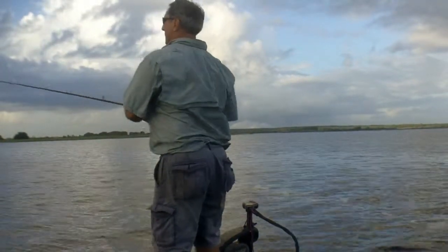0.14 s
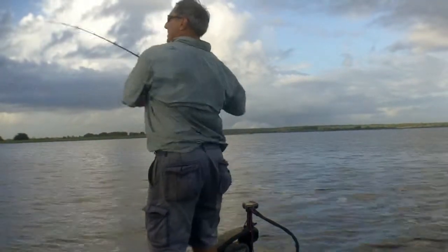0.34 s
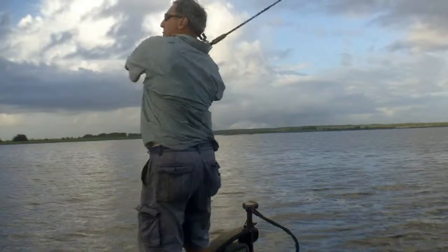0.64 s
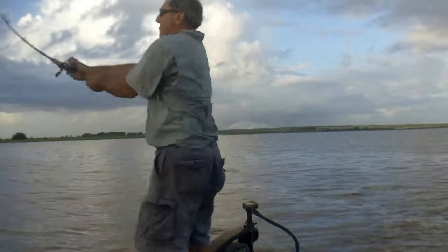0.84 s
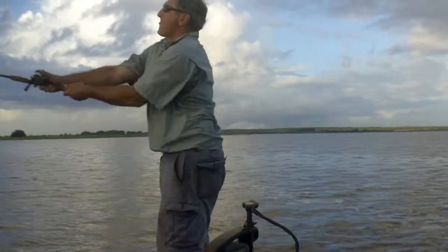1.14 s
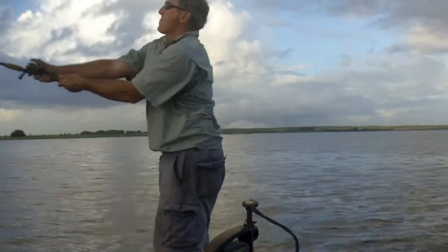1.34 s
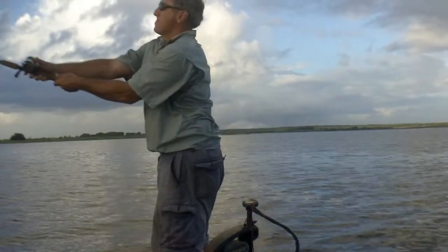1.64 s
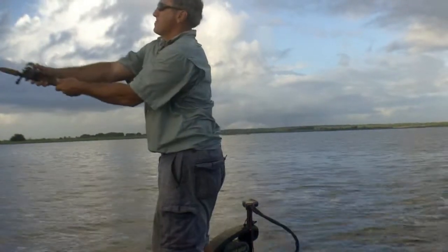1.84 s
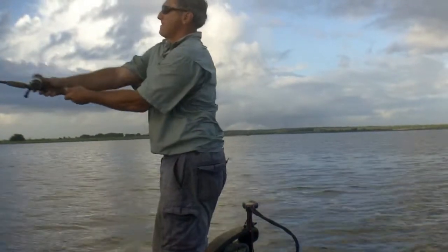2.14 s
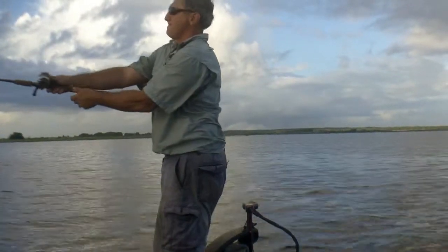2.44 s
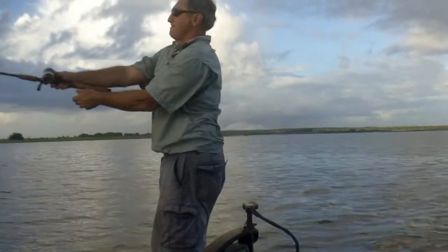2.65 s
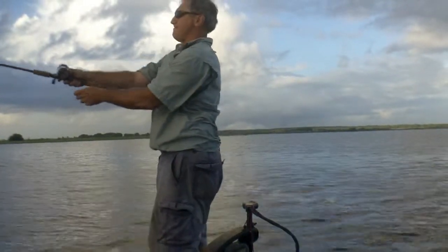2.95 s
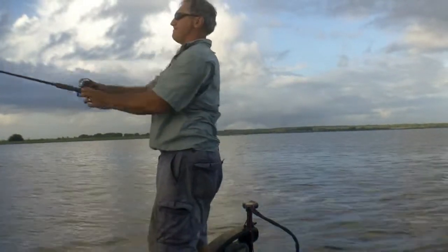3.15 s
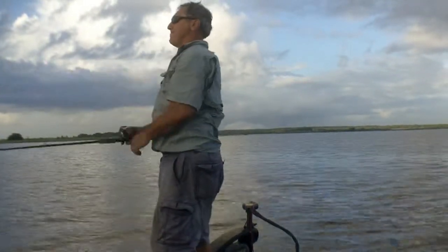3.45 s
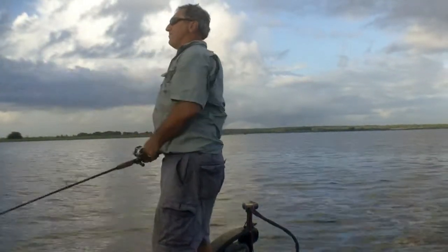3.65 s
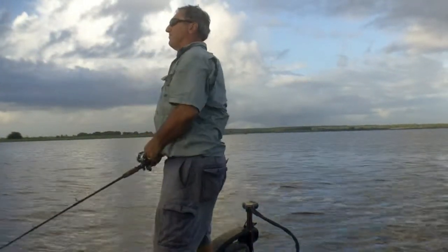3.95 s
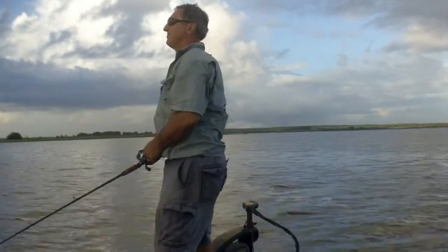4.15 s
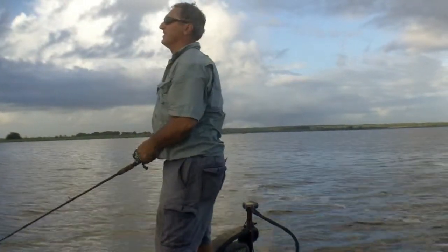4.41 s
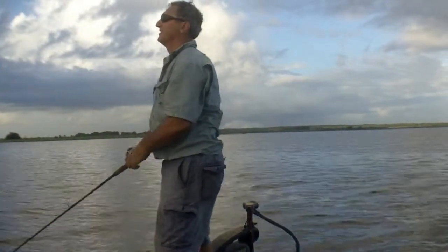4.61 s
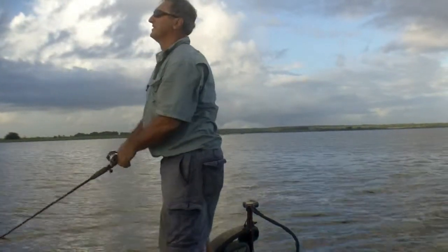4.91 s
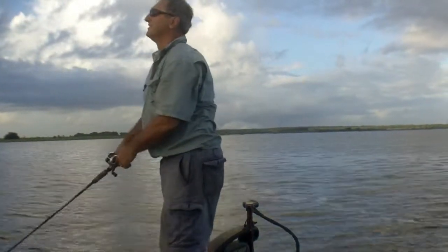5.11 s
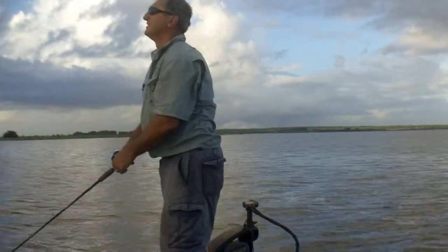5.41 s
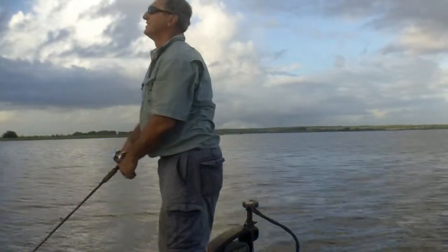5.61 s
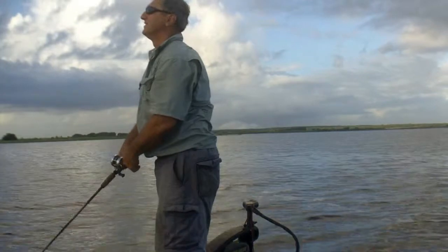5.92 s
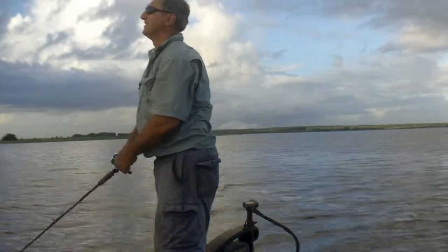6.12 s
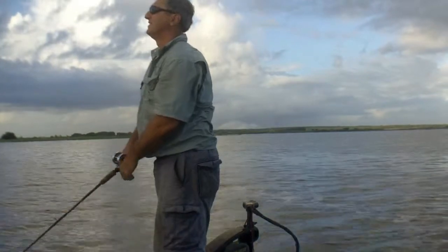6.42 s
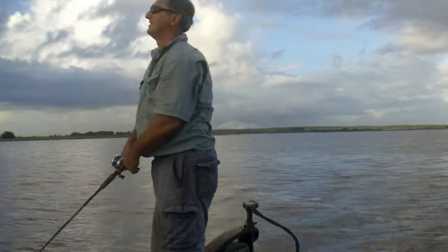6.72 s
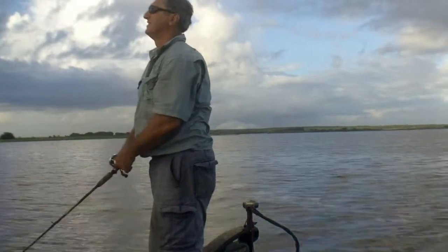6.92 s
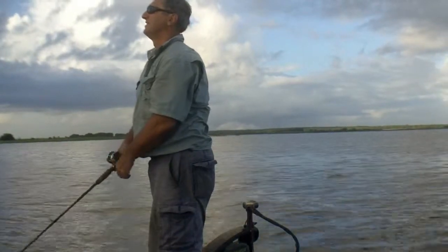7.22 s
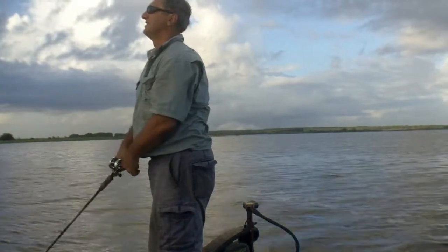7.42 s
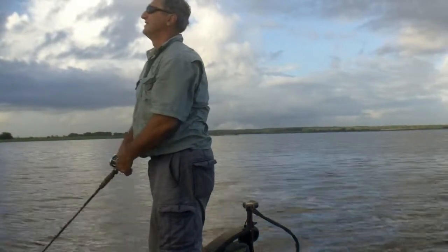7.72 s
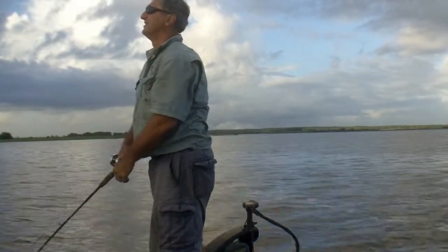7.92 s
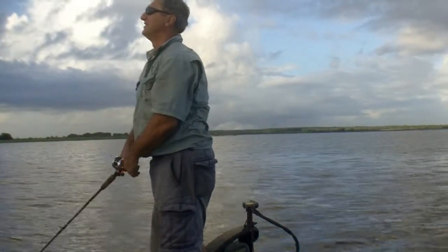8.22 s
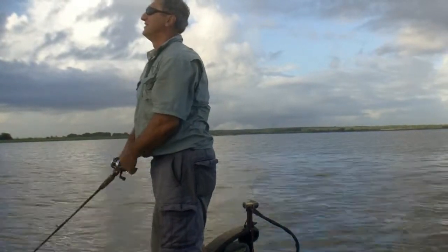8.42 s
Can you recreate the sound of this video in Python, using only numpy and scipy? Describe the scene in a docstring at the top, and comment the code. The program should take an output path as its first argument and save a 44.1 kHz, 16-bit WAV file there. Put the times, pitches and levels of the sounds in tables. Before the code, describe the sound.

Wind rumbles and buffets a close microphone throughout, on a small boat on a lake, over a faint hum, a soft hiss, trickling water and a thin, chopped electronic whine. A fishing reel rattles briefly at 0.3 seconds, and at 0.5 the rod whips with a sharp whoosh. Line hisses off the whirring spool with quick ticks, fading as it slows. A thin, very high squeal joins at about 2 seconds, and the spool stops at 2.6. Wavelets gurgle and slap at the hull around 2.2 and from 2.9 to 3.8, with a sharp click near 3.1, then return now and then, most clearly near 5, 7.3 and 8.2. From about 4.6 seconds the reel is wound, giving short, light rattles roughly three times a second and scattered dry clicks. Low wind thumps grow stronger around 5.3 and are heaviest from 8 seconds to the end.

```python
"""A small boat on a windy lake, a pocket camera close to an angler. The reel rattles as it is moved, and
half a second in the rod whips. Line hisses off the slowing spool with ticks, a whirr and at last a thin
squeal, until the thumb stops it at 2.6 s. Wavelets gurgle and slap at the hull, and from about 5 s the
handle rattles once a turn. All along wind buffets the microphone, over a hum, a hiss and the camera's
own chopped whine."""
import sys
import numpy as np
from scipy import signal
from scipy.fft import rfft, irfft, next_fast_len
from scipy.io import wavfile
from scipy.ndimage import uniform_filter1d

SR = 44100
rng = np.random.default_rng(int(sys.argv[2]) if len(sys.argv) > 2 else 0)


def waveform_to_disk(signal):
    """Save audio, clipped to [-1, 1], as 16-bit WAV at the path in sys.argv[1]."""
    frames = np.transpose(np.atleast_2d(signal))
    scaled = np.clip(frames, -1, 1) * 32767
    samples = np.round(scaled).astype(np.int16)
    wavfile.write(sys.argv[1], SR, samples)


N = 377496
T = np.arange(N) / SR
LET_GO_S, BEATS_PER_S = .5094, 12.896  # the spool's release, and its tick rate at full speed

# Line rubbing in the guides. Each row: frequency in Hz, spectral level in dB.
LINE_COLOUR = [(3500, -34), (5000, -5), (6600, 0), (8000, -8), (11000, -17), (13000, -28), (15000, -47)]
# The midrange of clicks, scratches and fizz. Each row: frequency in Hz, spectral level in dB.
MID_COLOUR = [(600, -4), (1200, 2), (2000, 0), (3500, -12.5), (4500, -6)]
# The upper rumble of wind on the microphone. Each row: frequency in Hz, spectral level in dB.
RUMBLE_COLOUR = [(45, -30.5), (80, 2.5), (110, -1), (160, -8), (250, -22.5), (400, -33), (800, -39)]


def undb(db):
    """Decibels to gain."""
    return 10 ** (np.asarray(db) / 20)


def unit(x):
    """Scaled to rms 1."""
    return x / np.sqrt(np.mean(x ** 2))


def curves(table, outside):
    """The columns of a timed table, sample by sample."""
    s, *columns = np.transpose(table)
    return [np.interp(T, s, c, outside, outside) for c in columns]


def colour(x, points):
    """Filters x by a spectrum of (Hz, dB) points and scales it to rms 1."""
    size = next_fast_len(N)
    hz, db = np.transpose(points)
    bin_hz = np.arange(size // 2 + 1) * SR / size
    gain = undb(np.interp(np.log(bin_hz + 1), np.log(hz), db, -120, -120))
    return unit(irfft(rfft(x, size) * gain, size)[:N])


def white():
    """White noise as long as the scene."""
    return rng.standard_normal(N)


def walk(rate):
    """Random levels held 1 / rate s and smoothed twice, at rms 1."""
    k = int(SR / rate)
    held = rng.standard_normal(N // 50)[np.arange(N) // max(k, 50)]
    return unit(uniform_filter1d(uniform_filter1d(held, k), k))


def band(x, hz, width):
    """One resonance."""
    return signal.lfilter(*signal.iirpeak(hz, hz / width, SR), x)


def add(out, s, sound):
    """Mixes a sound in at s seconds."""
    i = int(s * SR)
    out[i:i + len(sound)] += sound[:len(out) - i]


def ring(hz, t60, rise=0., attack=0.00041):
    """A fading sine that glides by rise octaves a second, as a bubble does near the surface."""
    t = np.arange(int(t60 * SR) + 2) / SR
    phase = 2 * np.pi * np.cumsum(np.minimum(hz * 2 ** (rise * t), SR / 3)) / SR
    return np.sin(phase) * (1 - np.exp(-t / attack)) * np.exp(-np.log(1000) * t / t60)


def spool_speed(drag_per_s=.58964, friction_beats_per_s=6.3594, creep=0.11):
    """Share of full speed: air drag in proportion to speed plus constant braking, down to a creep."""
    since = np.maximum(T - LET_GO_S, 0)
    rate = (BEATS_PER_S + friction_beats_per_s) * np.exp(-drag_per_s * since) - friction_beats_per_s
    return np.where(T > LET_GO_S, np.maximum(rate / BEATS_PER_S, creep), 0)


def running(full_speed_db, power, spin_up_s=0.034, stop_s=2.62, fade_s=0.021):
    """Gain that follows a power of the spool's speed, from release until the thumb stops it."""
    on = np.clip((T - LET_GO_S) / spin_up_s, 0, 1) * np.clip((stop_s - T) / fade_s, 0, 1)
    return undb(full_speed_db) * on * spool_speed() ** power


def cast():
    """The rod cuts the air, line rubs unevenly through the guides, the spool whirrs in its frame."""
    # Strokes of the rod. Each row: peak time in seconds, level in dB, rise and fall in seconds.
    strokes = [(.27, -50.5, 0.11, 0.14), (0.536, -24.5, 0.042, 0.037)]
    # Resonances of the whirr. Each row: centre in Hz, width in Hz, relative level in dB.
    whirr_bands = [(2224, 670, -2.5), (2573, 660, 3), (3150, 740, 5.5), (3930, 1150, 1.5)]
    # Rushing air, and a high sizzle. Each row: frequency in Hz, spectral level in dB.
    whoosh_colour = [(300, -13), (600, -6.5), (1700, -8), (2400, -20)]
    sizzle_colour = [(7500, -2), (9500, 2), (11000, 2), (13000, -8), (14800, -11)]
    swing = sum(undb(db) * np.exp(-((T - s) / np.where(T < s, rise, fall)) ** 2)
                for s, db, rise, fall in strokes)
    line = colour(white() * undb(2.5 * walk(300) + 1.5 * walk(25)), LINE_COLOUR)
    rub = white() * undb(2.2 * walk(60))
    whirr = unit(sum(undb(db) * unit(band(band(rub, hz, width), hz, 2 * width))
                     for hz, width, db in whirr_bands))
    whoosh = colour(white(), whoosh_colour)
    drone = unit(band(band(rub, 2180, 660), 2180, 1400))  # the whirr's lowest note lingers
    sizzle = colour(white(), sizzle_colour)
    return (np.hypot(swing, running(-27.5, power=2.03)) * line
            + np.hypot(undb(-5) * swing, running(-33, power=1.58)) * whirr
            + np.hypot(undb(-4.5) * swing, running(-44.5, power=2.1)) * whoosh
            + running(-53.5, power=0.29) * drone
            + running(-56.5, power=0.17) * sizzle)


def spool_ticks(beat_count=9):
    """Each tick rings the spool's modes, lower and drier as it slows, with a scratch of line."""
    # Ticks off the beat, the release first. Each row: start in seconds, strength in dB.
    off_beat = [(.5094, -5), (.5346, -7), (0.633, -23), (0.8124, -18.5), (0.8366, -18), (0.9137, -24)]
    # The spool's modes. Each row: nominal pitch in Hz, relative level in dB, nominal t60 in seconds.
    modes = [(1430, -21, 0.024), (1970, -15, 0.043), (2300, -11.5, 0.022), (2654, -3.5, 0.022),
             (2950, -9, 0.047), (3740, -11, 0.018)]
    ringing, scratch_gain = np.zeros((2, N))
    speed = spool_speed()
    beats = np.searchsorted(np.cumsum(speed) * BEATS_PER_S / SR, np.arange(beat_count) + 1)
    on_beat = [(i / SR, -9 + 28 * np.log10(speed[i])) for i in beats]
    t = np.arange(800) / SR
    scratch_shape = np.exp(-t / 0.0047) * (1 - np.exp(-t / 0.00082))
    for s, db in on_beat + off_beat:
        pace = speed[int(s * SR) + 1]
        for hz, mode_db, t60 in modes:
            scatter_db, detune = rng.normal(0, [1.4, 0.056])
            tone = ring(hz * (.88 + 0.115 * pace + detune), t60 * (0.18 + 0.84 * pace))
            add(ringing, s, undb(db + mode_db + scatter_db) * tone)
        add(scratch_gain, s, undb(-26 + 0.45 * db) * scratch_shape)
    scratch = colour(white(), LINE_COLOUR) + 0.73 * colour(white(), MID_COLOUR)
    return ringing * undb(1.8 * walk(400)) + scratch_gain * scratch


def spool_squeal():
    """Just before the spool stops, a narrow band of noise tightens on a sinking pitch."""
    # The squeal's course. Each row: time in seconds, pitch in Hz, level in dB, spread in Hz.
    course = [(1.8, 11040, -72, 206), (1.95, 11100, -63, 205), (2.05, 10840, -53, 167),
              (2.3, 10750, -52, 60), (2.6, 10740, -52.5, 30), (2.635, 10720, -75, 30)]
    hz, db, spread = curves(course, -120)
    phase = 2 * np.pi * np.cumsum(np.maximum(hz + spread * walk(460), 0)) / SR
    return undb(db) * ((0.93 + 0.5 * walk(170)) * np.sin(phase) + 0.52 * walk(260) * np.cos(phase))


def spool_whine():
    """Just after release the spool whines faintly at two and three times its falling turn rate."""
    # The spin. Each row: time in seconds, turns per second, level in dB.
    spin = [(.55, 430, -55), (.6, 340, -49), (.78, 302, -45.5), (.95, 260, -66)]
    turns, db = curves(spin, -120)
    angle = 2 * np.pi * np.cumsum(np.maximum(turns, 0) * (1 + .05 * walk(60))) / SR
    return undb(db + 3.7 * walk(29.6)) * (np.sin(2 * angle) + 0.6 * np.sin(3 * angle))


def reel_rattle(knocks_per_s=240, knock_decay_s=.0006, winding_from_s=5.1):
    """A loose part knocks and scrapes as the reel is moved, then once a turn; winding scrapes faintly."""
    # Bursts of rattling. Each row: start in seconds, length in seconds, relative level in dB.
    bursts = [(0.265, 0.03, -54), (2.15, 0.093, -51), (2.675, 0.026, -54.5), (4.645, 0.056, -46),
              (4.958, 0.048, -49.5), (5.272, 0.043, -57), (5.536, 0.034, -55), (5.836, 0.047, -50.5),
              (5.978, .025, -61), (6.14, 0.041, -54), (6.263, .03, -56), (6.413, 0.059, -48.5),
              (6.697, 0.079, -48), (7.022, .04, -55.5), (7.312, 0.067, -46), (7.617, 0.041, -49),
              (7.949, 0.016, -43), (8.208, 0.055, -48), (8.513, 0.045, -57)]
    # Sharp knocks, and a duller scrape. Each row: frequency in Hz, spectral level in dB.
    knock_colour = [(3000, -2), (6500, 6.5), (9000, -2.5), (12000, -2.5), (15000, -11)]
    scrape_colour = [(1500, -7), (3200, -4.5), (5000, -10.5), (6200, 0), (8000, -9), (11000, -11.5)]
    gate = np.zeros(N)
    for s, length, db in bursts:
        add(gate, s, undb(db) * np.hanning(int(length * SR)) ** .5)
    impacts = (rng.random(N) < knocks_per_s / SR) * undb(2.5 * white())
    decays = signal.lfilter([1], [1, -np.exp(-1 / (knock_decay_s * SR))], impacts)
    knocks = colour(white() * decays, knock_colour)
    scrape = colour(white() * undb(4.8 * walk(150)), scrape_colour)
    winding = undb(-79 + 6 * walk(25)) * (T > winding_from_s)
    return 1.05 * gate * knocks + (1.09 * gate + winding) * scrape


def reel_clicks():
    """Lone dry clicks: a snap and a short tail of noise, in a low and a high band."""
    # Each row: start in seconds, level of the low band in dB, the high band against it in dB.
    clicks = [(0.289, -42, 1), (2.7373, -38, -21), (2.7524, -44, -17), (3.0774, -21, -3),
              (3.5746, -36.5, -12), (3.6573, -38.5, -23), (3.9697, -37, -6.5), (4.664, -48, 12),
              (4.674, -43.5, 11.5), (4.8779, -42, -30), (5.009, -57, 14), (5.4663, -37.5, -5.5),
              (6.0317, -48, -18), (6.476, -37, 0), (6.6862, -40, -23), (6.8348, -34.5, -1.5),
              (6.889, -44, -18), (7.4493, -36, 1.5), (7.9059, -53, 8), (7.958, -54, 12)]
    # The bright edge of a click. Each row: frequency in Hz, spectral level in dB.
    edge_colour = [(4000, -13), (5500, 6.5), (7000, -2.5), (10000, -10), (14500, -26)]
    low, high = np.zeros((2, N))
    t = np.arange(800) / SR
    snap = np.exp(-t / .001)
    for s, db, high_db in clicks:
        add(low, s, undb(db) * (snap + 0.57 * np.exp(-t / 0.01)))
        add(high, s, undb(db + high_db) * (snap + 0.41 * np.exp(-t / 0.0057)))
    return low * colour(white(), MID_COLOUR) + high * colour(white(), edge_colour)


def hull_gurgles():
    """Single bubbles at the hull ring, warble and fizz until the surface closes over them."""
    # Each row: start in seconds, level in dB, first pitch in Hz, length in seconds, octaves per second.
    bubbles = [(.84, -29, 485, 0.016, -3.5), (2.177, -34.5, 837, 0.046, 10.5),
               (2.196, -31.5, 2594, 0.015, -14), (2.201, -21, 854, 0.0059, 12),
               (2.21, -21, 2170, 0.0022, -6), (2.228, -22.5, 1010, .0032, 47),
               (2.685, -43.5, 1500, .013, 17.5), (2.697, -31, 425, 0.024, 7),
               (2.928, -36.5, 1740, .011, 28), (2.993, -39, 1900, 0.0077, 17),
               (3.006, -36.5, 2570, 0.0072, 21), (3.038, -23, 1120, 0.01, 12), (3.059, -28, 1610, .019, 1),
               (3.074, -15.5, 1170, 0.0041, 24), (3.088, -24, 655, 0.013, 6), (3.097, -25, 950, 0.0058, 17),
               (3.147, -33, 1320, 0.0071, -14), (3.23, -28, 1200, 0.0069, 6),
               (3.273, -34.5, 1170, 0.0055, 21), (3.318, -41, 1270, 0.0078, 38),
               (3.35, -42, 2740, 0.0058, 14), (3.378, -38, 1180, .0054, -10), (3.577, -36, 1070, 0.02, 7),
               (3.63, -32, 477, 0.015, -18), (3.7, -35.5, 380, 0.015, 17), (3.742, -35, 421, 0.021, 34.5),
               (3.82, -33, 285, 0.037, 6.5), (3.912, -38, 292, 0.025, 11), (3.971, -24.5, 1815, 0.0059, -1),
               (4.124, -31.5, 573, .017, -3), (4.469, -39, 2120, 0.0058, 3), (4.486, -29.5, 350, 0.025, 18),
               (4.527, -35.5, 725, .01, -7), (4.553, -32, 2080, 0.0088, -9), (4.674, -36, 1160, 0.014, -4),
               (4.77, -33.5, 292, 0.056, -1.5), (4.773, -36.5, 1400, 0.0094, -1),
               (4.796, -42, 1410, 0.021, 11), (4.97, -38.5, 1960, .0066, 4), (4.972, -26, 559, 0.021, -1.5),
               (5.169, -27.5, 1010, 0.0053, 5), (5.497, -41, 1800, 0.017, 0),
               (6.141, -38, 2420, .0065, -11), (6.165, -41, 1263, 0.0092, 6.5),
               (6.385, -41, 2870, .007, 12), (6.479, -43, 965, .0086, 26), (6.702, -42, 1535, 0.017, 8),
               (6.838, -40, 970, 0.012, 11), (7.206, -36.5, 870, 0.0093, 6), (7.24, -40, 640, .017, 19),
               (7.267, -33, 735, 0.013, -21), (7.324, -34, 717, 0.033, 12), (7.333, -26, 1150, 0.018, 41),
               (7.346, -34, 2210, .0063, 7), (7.348, -31.5, 623, .013, -1), (7.368, -33.5, 446, 0.02, 1),
               (7.408, -32, 880, 0.0072, 29), (7.449, -42, 1030, .012, 7), (7.957, -40.5, 910, 0.012, 15),
               (8.164, -26, 1193, 0.017, -1.5), (8.176, -20.5, 1082, 0.013, -10.5),
               (8.191, -29, 873, 0.012, 7)]
    tones, fizz_gain = np.zeros((2, N))
    for s, db, hz, length, rise in bubbles:
        tone = ring(hz, 6.06 * length, rise, attack=0.028 * length)
        age = np.arange(len(tone)) / (length * SR)
        closing = np.exp(-(age / 2.5) ** 4)
        add(tones, s, undb(db) * tone * closing)
        add(fizz_gain, s, undb(db - 19.5) * np.exp(-age / 1.5))
    # a wandering phase roughens each tone
    rough = np.real(signal.hilbert(tones, next_fast_len(N))[:N] * np.exp(1j * 0.68 * walk(350)))
    fizz = colour(white() * undb(8.3 * walk(300)), MID_COLOUR)
    return rough * undb(1.53 * walk(250)) + fizz_gain * fizz


def wavelet_slaps(spread_octaves=1.8):
    """Each slap is a spray of small rising bubbles; a faint trickle of them runs throughout."""
    # Each row: start in seconds, length in seconds, typical bubble level in dB, centre pitch in Hz.
    slaps = [(2.178, 0.06, -32, 2120), (2.74, 0.024, -60, 1700), (2.879, 0.11, -46.5, 1710),
             (3.239, 0.14, -45.5, 2000), (3.01, 0.071, -41.5, 2220), (3.052, 0.12, -42, 1930),
             (3.102, 0.058, -38, 2160), (3.385, 0.067, -46.5, 1430), (3.574, 0.055, -45, 1950),
             (3.705, 0.056, -48, 495), (4.485, 0.045, -54, 800), (4.773, 0.11, -64, 1610),
             (4.964, 0.016, -30.5, 1610), (6.155, 0.029, -44.5, 870), (6.37, .11, -50, 2210),
             (7.002, .06, -52.5, 2000), (7.198, 0.11, -46, 920), (7.314, 0.058, -33.5, 1860),
             (7.34, 0.076, -47.5, 660), (8.155, 0.051, -34, 1930)]
    trickle = (0, N / SR, -48.0, 1503)
    spray = np.zeros(N)
    for s, length, db, centre_hz in slaps + [trickle]:
        count = int(min(700 * length, 60 * length + 40, 500))
        for when, pitch in rng.random((count, 2)):
            hz = centre_hz * 2 ** (spread_octaves * (pitch - .5))
            bubble = ring(hz, t60=22 / hz, rise=11, attack=0.001)
            add(spray, s + when * length, undb(rng.normal(db, 5.1)) * bubble)
    return spray


def wind():
    """Eddies push on the membrane: a deep buffet and a rumble that flutter together, and lone puffs."""
    # Gusts at the microphone. Each row: time in seconds, buffet level in dB, rumble level in dB.
    gusts = [(0.0, -36, -35), (0.07, -30, -34), (1.67, -28, -33), (2.19, -32.5, -37), (2.34, -18.5, -29),
             (2.46, -30, -38), (3.05, -24, -30), (3.07, -30, -24), (3.22, -30, -33.5), (3.84, -32.5, -34.5),
             (3.91, -28, -28), (4.0, -33.5, -35.5), (4.6, -23, -29), (4.67, -30.5, -29.5),
             (5.22, -25, -34.5), (5.36, -28, -22.5), (5.41, -29.5, -30), (5.77, -23, -32), (6.56, -30, -33),
             (6.75, -20.5, -34), (7.03, -34, -34.5), (8.56, -14.5, -27.5)]
    # The deep buffet. Each row: frequency in Hz, spectral level in dB.
    buffet_colour = [(12, -28), (25, 0), (50, -5), (75, -9), (110, -48)]
    # Single strong puffs. Each row: centre time in seconds, peak level in dB, frequency in Hz.
    puffs = [(.335, -15.5, 40), (1.06, -19, 60), (2.314, -11, 76), (3.085, -10, 56), (3.899, -13.5, 56),
             (4.549, -17.5, 90), (5.16, -13.5, 94.5), (5.34, -8.5, 73.7), (7.804, -11.5, 65),
             (7.971, -10.5, 78.6), (8.234, -5, 85.5), (8.454, -7, 81), (8.51, -7.5, 50)]
    buffet_db, rumble_db = curves(gusts, -30)
    buffet = undb(buffet_db) * colour(white(), buffet_colour)
    rumble = undb(rumble_db) * colour(white(), RUMBLE_COLOUR)
    flutter = undb(2.95 * walk(12) + 0.5 * walk(4.08))
    out = flutter * (buffet + rumble)
    t = np.arange(-1500, 1500) / SR
    for s, db, hz in puffs:
        swell = undb(db) * np.exp(-(t * hz / 0.51) ** 2)
        add(out, s + t[0], swell * np.cos(2 * np.pi * (hz * t + rng.random())))
    return out


def hiss_and_hum(hum_hz=339.8):
    """A soft hiss and a wavering hum under everything."""
    # The hiss. Each row: frequency in Hz, spectral level in dB.
    hiss_colour = [(200, 8.5), (330, -0.5), (460, -6), (1000, -11), (1900, -17.5), (2500, -18), (4000, -20),
                   (6500, -18.5), (8000, -22), (12700, -28), (13100, -66)]
    hiss = undb(-50 + .7 * walk(3)) * colour(white(), hiss_colour)
    hum = undb(-53 + 0.43 * walk(7.5)) * np.sin(2 * np.pi * hum_hz * T + .5 * walk(7.7))
    return hiss + hum


def camera_whine(frame_hz=29.97):
    """The camera's own whine, locked to its frame rate, pauses once a frame."""
    # The whine's partials: their multiples of the frame rate, and their relative levels in dB.
    multiples = [80, 159, 221, 239, 257, 283, 301, 424]
    levels_db = [-71, -73, -57.5, -62, -74.5, -90, -70, -74.5]
    frame_phase = T * frame_hz % 1
    on = uniform_filter1d(1. * ((frame_phase < .65) | (frame_phase > .82)), size=110)
    return on * sum(undb(db + 3) * np.sin(2 * np.pi * k * frame_hz * T + k)
                    for k, db in zip(multiples, levels_db))


def scene():
    """Nearly mono at the microphone: the wind leans slightly right and a faint hiss adds width."""
    # Hiss in opposite phase left and right. Each row: frequency in Hz, spectral level in dB.
    side_colour = [(150, -22), (220, -9.5), (690, -16.5), (930, -26), (2700, -34), (3200, -52),
                   (7250, -47.5), (8500, -29.5), (12700, -33.5), (13200, -35)]
    air = wind()
    tackle = cast() + spool_ticks() + spool_squeal() + spool_whine() + reel_rattle() + reel_clicks()
    mid = tackle + hull_gurgles() + wavelet_slaps() + air + hiss_and_hum() + camera_whine()
    side = undb(-64 + 4.0 * walk(1.7)) * colour(white(), side_colour)
    side += 0.01 * np.std(air) * colour(white(), RUMBLE_COLOUR) - 0.013 * air
    return np.array([mid + side, mid - side])


def record(dry):
    """A cavity in the camera's case swallows one band, the strongest puffs are rounded, the top is cut."""
    cavity_hz, width_hz, ceiling, top_hz = 4200, 1540, .65, 15100
    notched = signal.lfilter(*signal.iirnotch(cavity_hz, cavity_hz / width_hz, SR), dry)
    rounded = notched / (1 + (notched / ceiling) ** 4) ** .25
    return signal.sosfilt(signal.ellip(10, .2, 80, top_hz, fs=SR, output="sos"), rounded)


dry = scene()
out = record(dry)
waveform_to_disk(out)
```